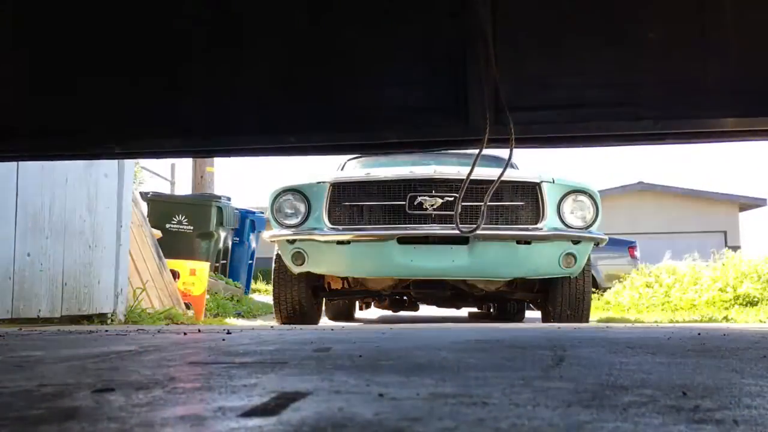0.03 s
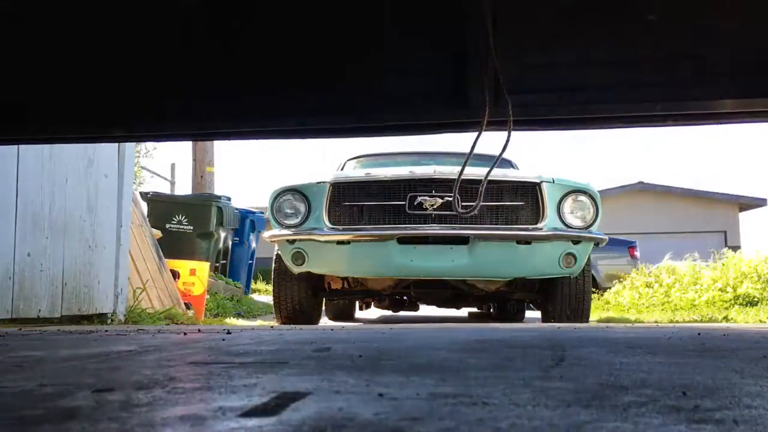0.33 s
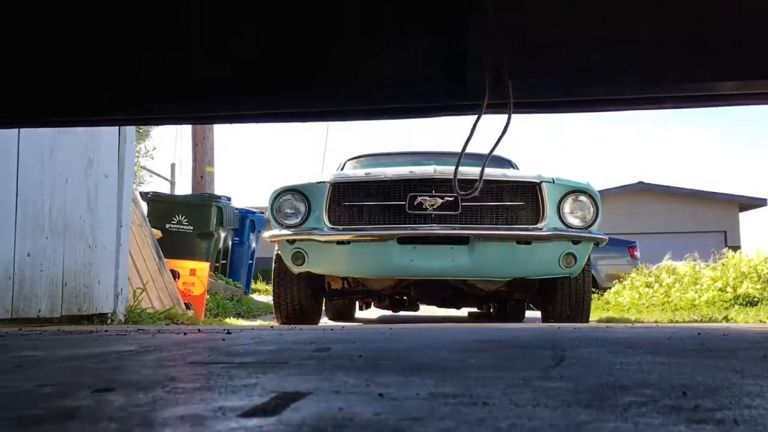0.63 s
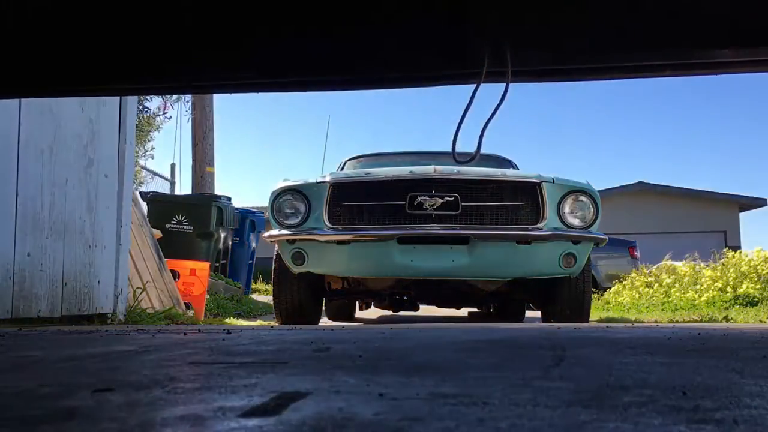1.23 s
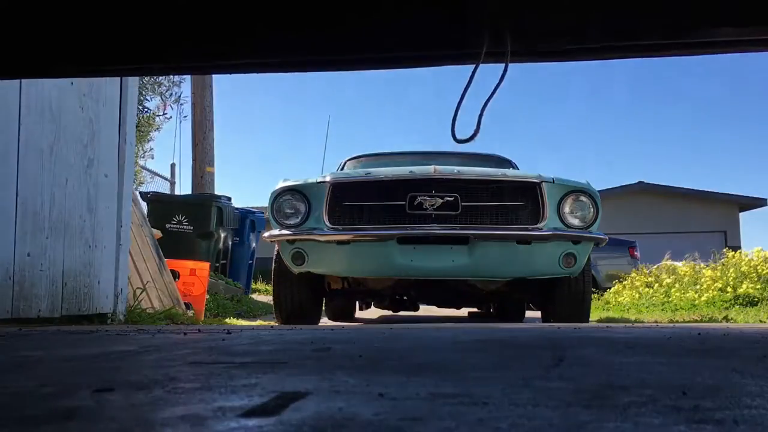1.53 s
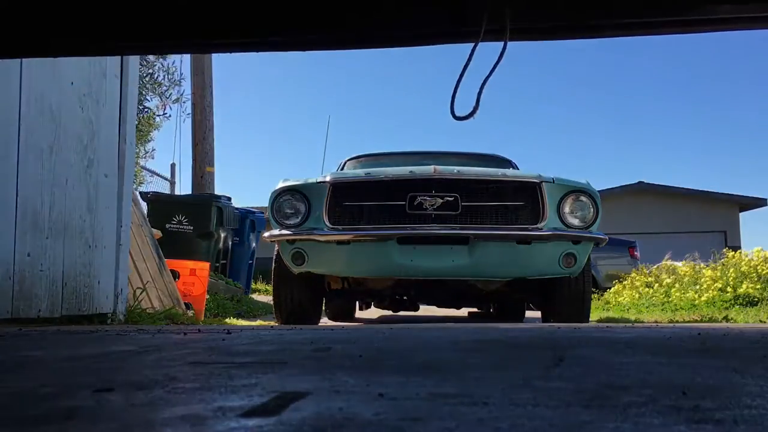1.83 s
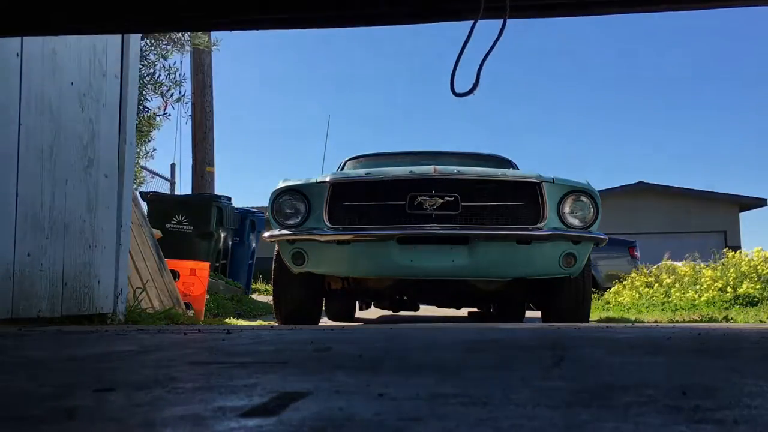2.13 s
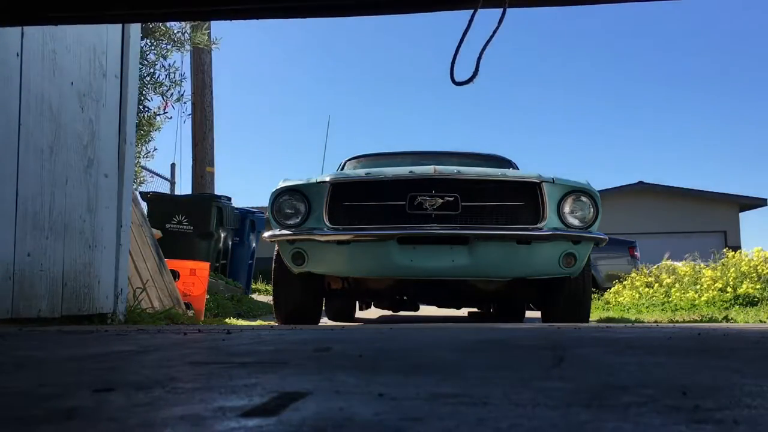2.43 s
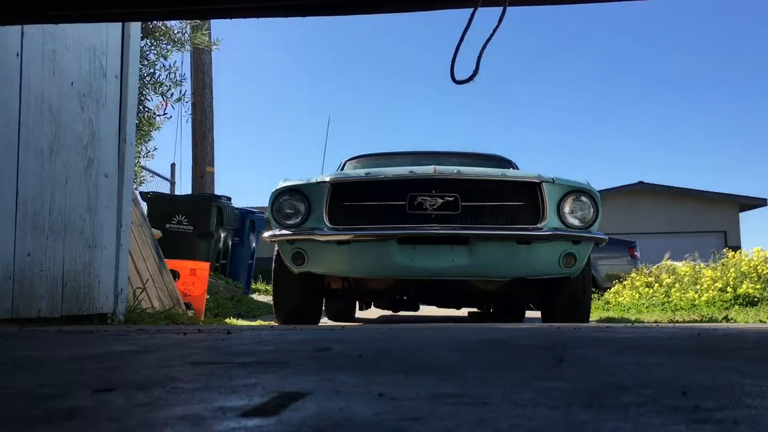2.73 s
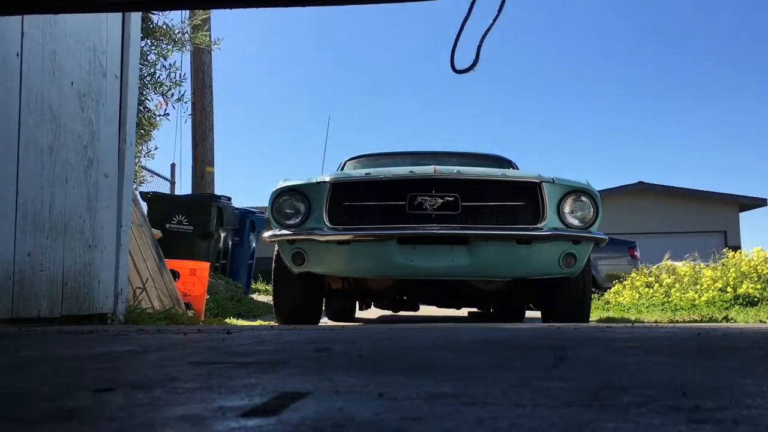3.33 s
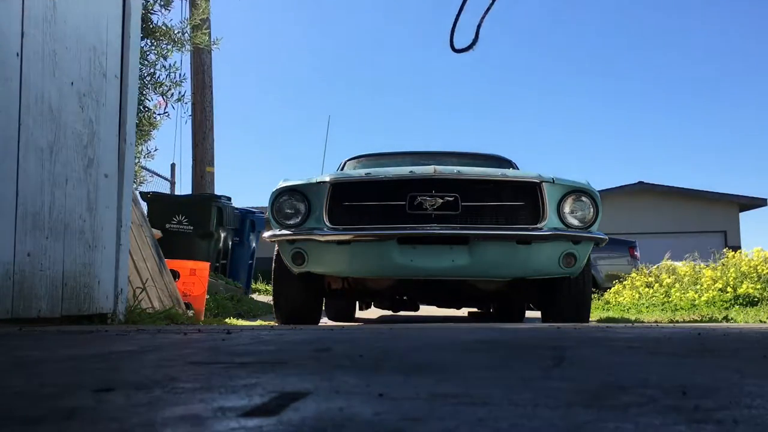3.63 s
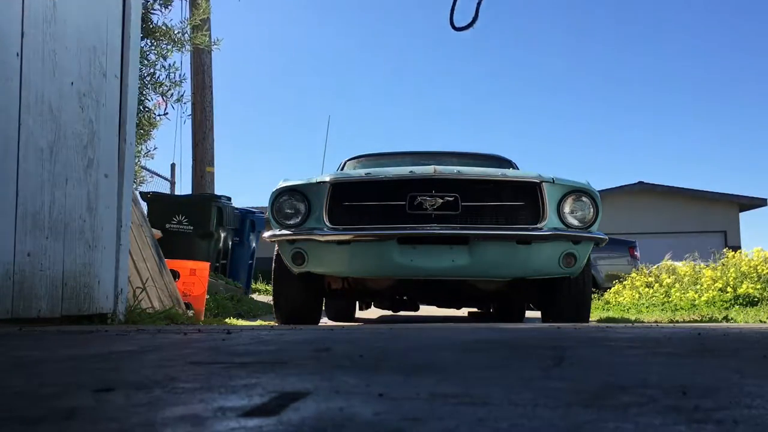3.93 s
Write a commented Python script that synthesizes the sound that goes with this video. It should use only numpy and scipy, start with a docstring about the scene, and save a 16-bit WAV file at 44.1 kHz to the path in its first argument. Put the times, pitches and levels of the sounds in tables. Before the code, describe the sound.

A garage door is raised, its panels booming and rattling as rollers knock along the track.

```python
"""A sectional garage door rolls up overhead; one microphone, down on the garage floor.
The wheels rumble from the start, a panel judders, and loose steel fittings clink and tick.
From 0.3 s each jolt of a roller in the track makes the panels boom and clatter; a dry hinge
shrieks into the curve, track joints clack and rollers squeak. Towards 3 s the door almost
stops, then it is pushed on through a last run of jolts and clinks."""
import sys
import numpy as np
from scipy import signal
from scipy.fft import irfft
from scipy.io import wavfile
from scipy.ndimage import uniform_filter1d

SR = 44100
rng = np.random.default_rng(int(sys.argv[2]) if len(sys.argv) > 2 else 0)


def int16_out(signal):
    """Quantize to a 16-bit WAV file."""
    q = np.round(np.clip(np.atleast_2d(signal).T, -1, 1) * 32767)
    wavfile.write(sys.argv[1], SR, q.astype(np.int16))


N = 176400
EVENT_SIZE = 32768  # samples in one short sound with its tail
EVENT_T, EVENT_HZ = np.arange(EVENT_SIZE) / SR, np.fft.rfftfreq(EVENT_SIZE, 1 / SR)


def amp(db):
    """Decibels to gain."""
    return 10 ** (np.asarray(db) / 20)


def unit(x):
    """Scales to an rms of one."""
    return x / np.sqrt(np.mean(x ** 2) + 1e-20)


def spectrum_db(points, hz):
    """Reads a spectrum on a log-frequency axis."""
    f, db = np.transpose(points)
    return np.interp(np.log(hz + 1), np.log(f), db)


def resonance(hz, centre, width):
    """A peak of height one, its width taken at half height."""
    return 1 / (1 + (2 * (hz - centre) / width) ** 2)


def decay(t60):
    """A ring that falls 60 dB in t60 seconds."""
    return amp(-60 * EVENT_T / t60)


def attack(rise_s):
    """A straight rise to full level."""
    return np.minimum(EVENT_T / rise_s, 1)


def add(mix, start_s, sound):
    """Mixes a sound in at a time."""
    part = mix[max(round(start_s * SR), 0):][:len(sound)]
    part += sound[:len(part)]


def noise(gain, size=EVENT_SIZE):
    """Noise of unit level with the given spectrum."""
    return unit(irfft(gain * np.exp(2j * np.pi * rng.random(len(gain))), size))


def wander(step_s):
    """Smooth random motion that changes about once a step."""
    return 1.2 * np.interp(np.arange(N) / SR / step_s, np.arange(4096), rng.standard_normal(4096))


def steady(x, window):
    """Evens out part of the chance swells of a noise."""
    power = np.abs(uniform_filter1d(x ** 2, window))
    return unit(x / (power + .05) ** .4)


STEEL_HZ = [1756, 2333, 2570, 2755, 3160, 3210, 3690]  # strongest notes of the hardware
def steel_db(ripple, hz, width_hz=35):
    """Fine resonances of the hardware: a few strong notes among many weak ones, mostly treble."""
    strong = sum(2 * resonance(hz, f, width_hz) for f in STEEL_HZ)
    weak = np.interp(hz / width_hz, np.arange(len(ripple)), ripple - uniform_filter1d(ripple, size=5))
    return strong + 4 * weak * hz / (hz + 3000)


# broad colour of the door from below: (frequency [Hz], level [dB])
DOOR_COLOUR = [(30, -23.5), (58, -1), (80, -10), (125, 1.5), (265, 0), (330, -4.5), (480, -9), (800, -14),
               (1250, -12.5), (1850, -23.5), (2150, -29.5), (4400, -34.5), (5100, -39.5), (9500, -38),
               (10500, -44), (12000, -40), (15500, -48)]
# resonances of panels and hinges: (frequency [Hz], width [Hz], lift [dB])
DOOR_MODES = [(55, 35, 5), (152.3, 5.1, 7), (174, 6.7, 9), (233, 7.7, 6.5), (261, 8.9, 5.5),
              (390.4, 17.8, 5.5), (549, 14.6, 11), (606.3, 14.7, 8.5), (663.3, 17.7, 5), (899, 69, 1.5),
              (1267, 13.3, 7.5)]
# boom, panel, clatter, rattle and sizzle bands: (low [Hz], high [Hz], rise [s], ring t60 [s])
DOOR_BANDS = [(39.6, 109.6, 0.031, 0.69), (99.5, 416, 0.016, 0.31), (411, 2160, 0.0077, 0.37),
              (1713, 6200, 0.011, 0.32), (6200, 15200, 0.0047, 0.29)]
def door_bands(ripple, size):
    """The door's resonant spectrum, split into its five bands."""
    hz = np.fft.rfftfreq(size, 1 / SR) + 1e-3
    lift = sum(db * resonance(hz, f, width) for f, width, db in DOOR_MODES)
    colour = amp(spectrum_db(DOOR_COLOUR, hz) + lift + steel_db(ripple, hz))
    return [colour / np.sqrt((1 + (lo / hz) ** 10) * (1 + (hz / hi) ** 10)) for lo, hi, *_ in DOOR_BANDS]


# wheel rumble overhead: (time [s], boom [dB], panel [dB], clatter [dB], rattle [dB], sizzle [dB])
WHEEL_LEVELS = [(0, -34.5, -36, -37, -44, -60), (.2, -31, -30, -38.5, -50, -74),
                (.36, -52, -43, -40, -45.5, -70), (.5, -45, -44, -51.5, -61.5, -76),
                (.78, -43, -43, -53, -57.5, -68), (1.05, -38, -45.5, -51.5, -59.5, -70.5),
                (1.36, -33.5, -39, -44, -53.5, -64.5), (1.68, -36, -40, -47.5, -57.5, -67.5),
                (2.05, -52, -39, -44.5, -50.5, -62.5), (2.278, -33.5, -41, -39.5, -52.5, -69.5),
                (2.63, -45.5, -50, -58, -69, -76.5), (2.92, -56, -55.5, -56.5, -66, -78),
                (3.22, -50.5, -45, -48.5, -62.5, -75), (3.4, -39, -50, -48.5, -55.5, -67.5),
                (3.72, -38, -37, -43.5, -56.5, -69.5), (4, -35, -38.5, -42, -50.5, -66)]
def wheels(ripple):
    """Wheels run over the bumps and grit of the track and keep the door rumbling."""
    out, t = np.zeros(N), np.arange(N) / SR
    times, *levels = np.transpose(WHEEL_LEVELS)
    bumps_db, grit_db = 1.94 * wander(.025), wander(.002)
    for band, (gain, db) in enumerate(zip(door_bands(ripple, N), levels)):
        level = np.interp(t, times, db) + bumps_db + grit_db * (band > 1)  # grit from the clatter up
        out += amp(level) * steady(noise(gain, N), window=4000)
    return out


# a shaking panel: (time [s], level [dB])
JUDDER_LEVELS = [(0, -46), (.14, -32), (.33, -27.5), (.49, -39), (.6, -33), (.83, -39.5)]
def judder(pitch_hz=153.9):
    """A panel shudders unevenly at its own note while the door gathers speed."""
    cycles = np.cumsum(pitch_hz * (1 + .037 * wander(.014))) / SR
    level = np.interp(np.arange(N) / SR, *np.transpose(JUDDER_LEVELS), right=-120) + 3 * wander(.0227)
    return np.sqrt(2) * amp(level) * np.sin(2 * np.pi * cycles)


STRIKE_RISE_S, ROOM_T60 = .00088, .28
# loose fittings: (time [s], level [dB], centre [Hz], width [octaves])
FITTING_CLINKS = [(0.038, -37.5, 1700, 0.95), (0.053, -33.5, 3020, 0.74), (2.195, -44, 3600, 0.86),
                  (2.907, -50, 1220, 0.45), (3.021, -53, 845, 1.1), (3.176, -51.5, 3730, 0.4),
                  (3.254, -45.5, 2340, 1.95), (3.602, -35, 3520, 0.78), (3.605, -37, 1730, 0.38),
                  (3.759, -42.5, 2670, 1.1), (3.878, -40, 1630, 1.18)]
def clinks(ripple):
    """Loose steel snaps against steel and rings on in the garage."""
    out, hz = np.zeros(N), EVENT_HZ + 1
    snap = .43 * np.exp(-EVENT_T / .004)
    shape = attack(STRIKE_RISE_S) * (decay(ROOM_T60) + snap)
    steel = amp(1.45 * steel_db(ripple, hz))
    for start, db, centre, width in FITTING_CLINKS:
        gain = steel / (1 + (np.log2(hz / centre) / width) ** 2) ** 2.1
        add(out, start, amp(db) * shape * noise(gain))
    return out


# colour of a tick: (frequency [Hz], level [dB])
TICK_COLOUR = [(1000, -22), (3000, 1), (5000, 3.5), (12500, 0), (16000, -8)]
# dry ticks near the microphone: (time [s], level [dB], decay time [s])
NEAR_TICKS = [(0.15, -52, .004), (0.223, -48, 0.0016), (0.316, -52, .009), (2.536, -57.5, 0.0015),
              (3.099, -46, 0.017), (3.493, -48.5, .004), (3.6, -45.5, .006), (3.759, -63, 0.0034),
              (3.88, -58, 0.0057)]
def ticks():
    """Fittings tick close by, short and bright, with a faint room tail."""
    out = np.zeros(N)
    gain = amp(spectrum_db(TICK_COLOUR, EVENT_HZ))
    room = amp(-15.5) * decay(t60=.4)
    for start, db, decay_s in NEAR_TICKS:
        add(out, start, amp(db) * (np.exp(-EVENT_T / decay_s) + room) * noise(gain))
    return out


HOLD_S, PANEL_LIFT_DB, PANEL_WIDTH_HZ = .0091, 6.5, 56
REBOUND_DB, REBOUND_S, REBOUND_GAP_S = 13, .001, .017  # hard contacts just after each jolt
# rollers jolt the door overhead:
# (time [s], panel pitch [Hz], boom [dB], panel [dB], clatter [dB], rattle [dB], sizzle [dB])
DOOR_JOLTS = [(0.291, 128, -43, -20, -33, -55, -69), (.374, 380, -35, -21, -32.5, -63, -65),
              (0.538, 650, -29, -19, -27.5, -47, -57.5), (.827, 229, -28.5, -19, -23.5, -39.5, -49.5),
              (1.193, 300, -27.5, -17.5, -27, -42, -50), (1.447, 249, -27.5, -21, -27.5, -40, -49.5),
              (1.484, 242, -55, -20, -35, -41, -55), (1.709, 238, -24, -18, -25, -34.5, -43.5),
              (1.913, 460, -33, -30, -34.5, -42.5, -59), (1.945, 204, -33.5, -22, -34.5, -68, -80),
              (2.117, 510, -27, -24, -31.5, -39, -51.5), (2.196, 540, -40, -42, -34, -58, -73),
              (3.268, 226, -28, -20.5, -32.5, -44.5, -61), (3.485, 570, -35.5, -25, -32.5, -46, -69),
              (3.526, 163, -43, -25.5, -41.5, -72, -78), (3.639, 220, -29.5, -22, -32, -47, -63),
              (3.806, 162, -26, -24, -34.5, -48, -59.5)]
def jolts(ripple):
    """Each jolt spreads through the panels, treble first, rebounds and dies away in the garage."""
    out, bands = np.zeros(N), door_bands(ripple, EVENT_SIZE)
    u = EVENT_T / REBOUND_S
    contact = np.diff(u * np.exp(-u) * (1 - np.exp(-2 * u)))
    contact /= contact.max()
    for start, pitch, *levels in DOOR_JOLTS:
        panel = amp(PANEL_LIFT_DB * resonance(EVENT_HZ, pitch, PANEL_WIDTH_HZ))
        for gain, db, (_, _, rise, t60) in zip(bands, levels, DOOR_BANDS):
            ring = amp(-60 * np.maximum(EVENT_T - rise - HOLD_S, 0) / t60)
            body = steady(noise(gain * panel), window=1300)
            add(out, start, amp(db) * attack(rise) * ring * body)
        clatter_db = levels[2]
        for bounce in (1, 2):
            delay = (bounce + rng.random() - .5) * REBOUND_GAP_S
            add(out, start + delay, amp(clatter_db + REBOUND_DB) * contact / np.sqrt(bounce))
    return out


def chime(pitches, t60):
    """Clean steel notes ring out and die, some struck harder than others."""
    notes = sum(rng.uniform(.44, 1) * np.sin(2 * np.pi * (f * EVENT_T + rng.random())) for f in pitches)
    return unit(notes) * attack(HOLD_S) * decay(t60)


def hardware():
    """The same jolts set the steel hardware ringing."""
    out = np.zeros(N)
    for start, *_, rattle_db, _ in DOOR_JOLTS:
        add(out, start, amp(rattle_db - 8) * chime(STEEL_HZ, t60=.5))
    return out


HINGE_HZ = [4140, 4245, 4320, 4420]
# colour of a shriek: (centre [Hz], half-width [Hz], level [dB])
SHRIEK_BANDS = [(4370, 360, 6.5), (11650, 1100, -3)]
# a dry hinge overhead: (time [s], level [dB])
HINGE_SHRIEKS = [(0.532, -56), (0.822, -52), (1.19, -46.5), (1.443, -45.5), (1.707, -45.5)]
def hinges():
    """A hinge slips with a shriek as it bends into the track's curve; its high notes sing on."""
    out, shape = np.zeros(N), attack(.0053) * decay(t60=.27)
    for start, db in HINGE_SHRIEKS:
        shriek = sum(amp(band_db) * noise(1 / (1 + ((EVENT_HZ - f) / width) ** 2) ** 2)
                     for f, width, band_db in SHRIEK_BANDS)
        singing = amp(-2) * chime(HINGE_HZ, t60=.62)
        add(out, start, amp(db) * (shape * shriek + singing))
    return out


# blows on the track joints: (time [s], level [dB])
JOINT_CLACKS = [(.544, -28.5), (.829, -20.5), (2.122, -35), (3.488, -38)]
def clacks(centre_hz=833):
    """A roller hits a joint in the track: a short, hard, hollow blow."""
    out, shape = np.zeros(N), attack(STRIKE_RISE_S) * decay(t60=.097)
    gain = 1 / (1 + np.log2((EVENT_HZ + 1) / centre_hz) ** 2) ** 3
    for start, db in JOINT_CLACKS:
        add(out, start, amp(db) * shape * noise(gain))
    return out


# high squeaks and low groans: (time [s], level [dB], pitch [Hz], half-width [Hz], length [s])
ROLLER_SQUEAKS = [(1.477, -50, 8270, 950, 0.056), (2.19, -43.5, 511, 12, 0.13),
                  (2.455, -45, 528, 47, 0.055), (3.255, -53, 8240, 350, 0.0051)]
def squeaks():
    """A dry roller rubs briefly at one narrow pitch, and the note lingers in the garage."""
    out = np.zeros(N)
    for start, db, pitch, width, length in ROLLER_SQUEAKS:
        u = 2 * EVENT_T / length
        rub = u * np.exp(1 - u)
        room = .5 * attack(length / 2) * decay(ROOM_T60)
        gain = 1 / (1 + ((EVENT_HZ - pitch) / width) ** 4)
        add(out, start, amp(db) * (rub + room) * noise(gain))
    return out


def scene():
    """The whole door as it reaches the microphone on the floor, in mono."""
    ripple = rng.standard_normal(2048)  # one set of weak steel resonances for the whole door
    mix = wheels(ripple) + judder() + clinks(ripple) + ticks()
    mix += jolts(ripple) + hardware() + hinges() + clacks() + squeaks()
    return mix[None]


def record(dry, cutoff_hz=15900):
    """The recorder cuts off the highest treble."""
    lowpass = signal.firwin(511, cutoff_hz, window=("kaiser", 9), fs=SR)
    return signal.oaconvolve(dry, lowpass[None], "same")


dry = scene()
out = record(dry)
int16_out(out)
```